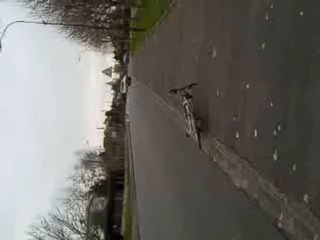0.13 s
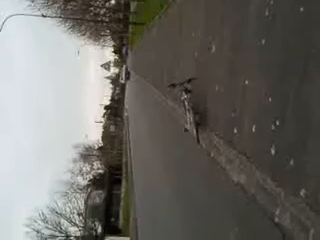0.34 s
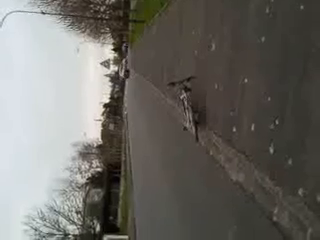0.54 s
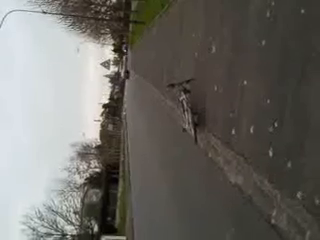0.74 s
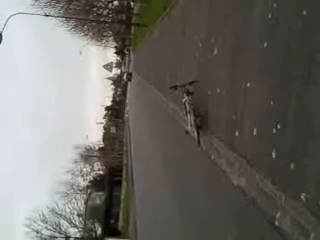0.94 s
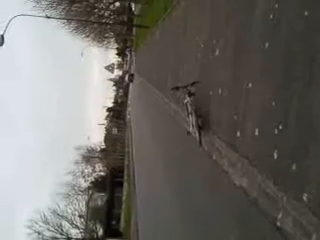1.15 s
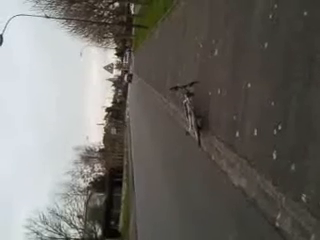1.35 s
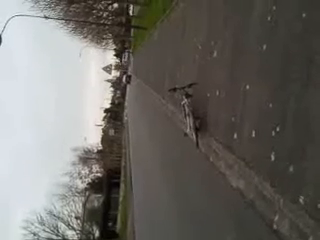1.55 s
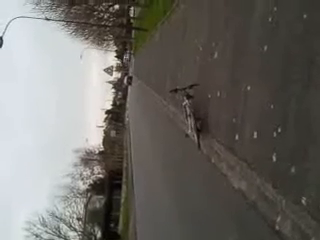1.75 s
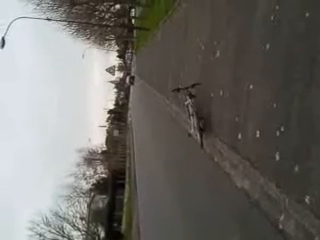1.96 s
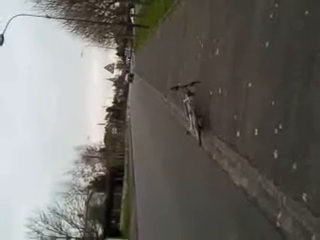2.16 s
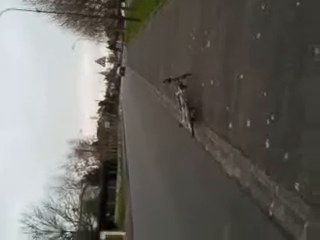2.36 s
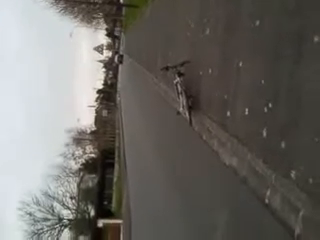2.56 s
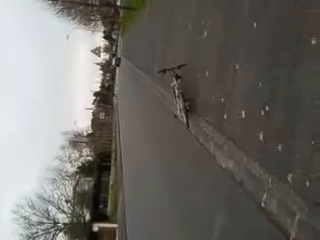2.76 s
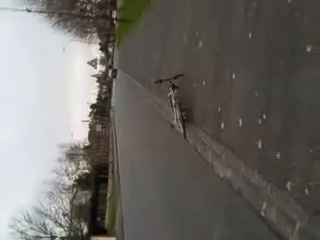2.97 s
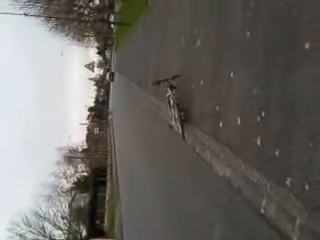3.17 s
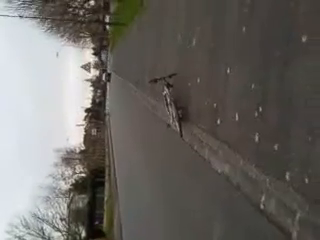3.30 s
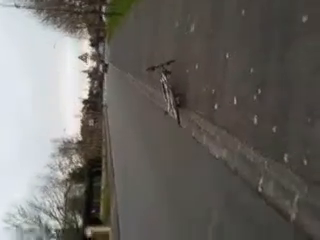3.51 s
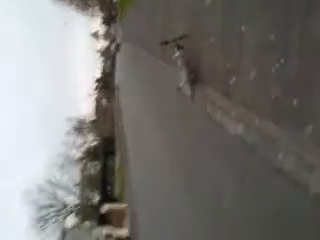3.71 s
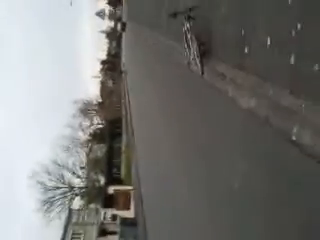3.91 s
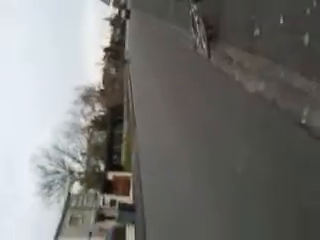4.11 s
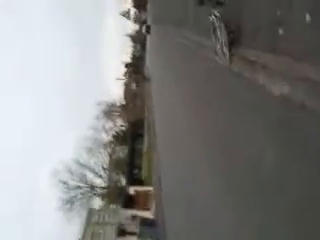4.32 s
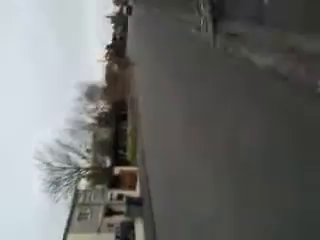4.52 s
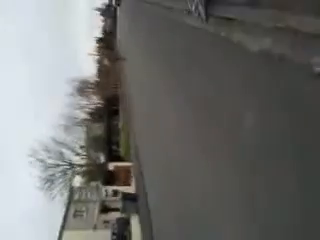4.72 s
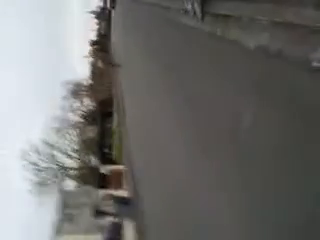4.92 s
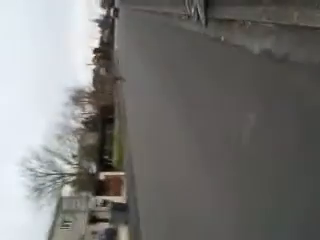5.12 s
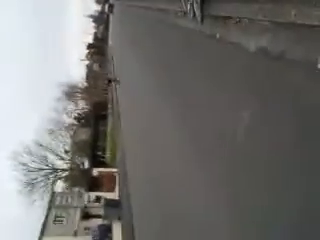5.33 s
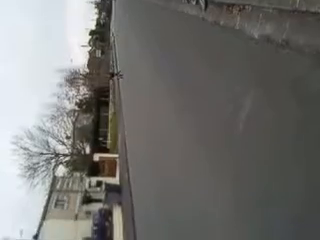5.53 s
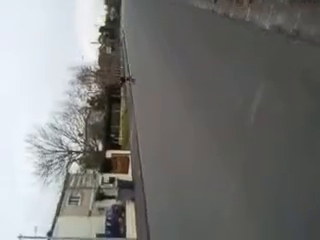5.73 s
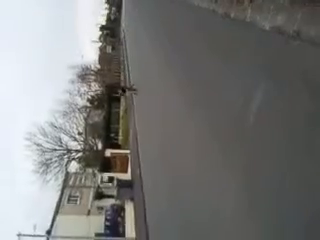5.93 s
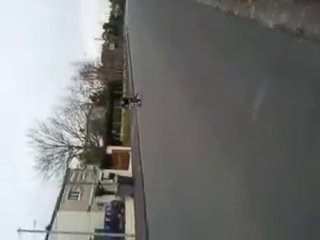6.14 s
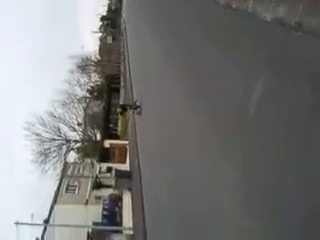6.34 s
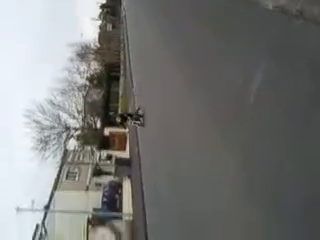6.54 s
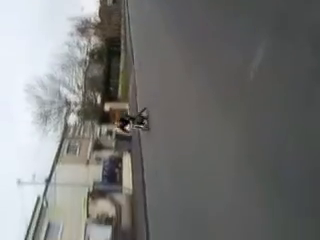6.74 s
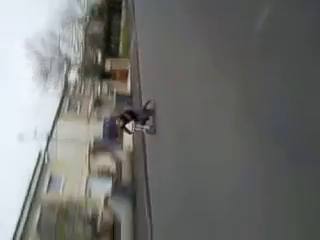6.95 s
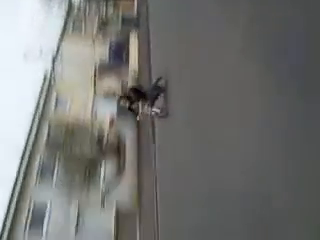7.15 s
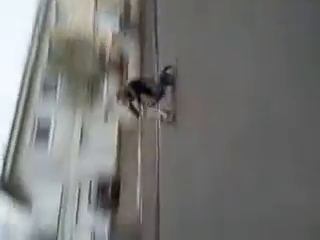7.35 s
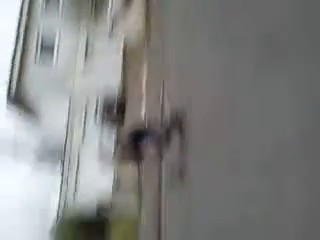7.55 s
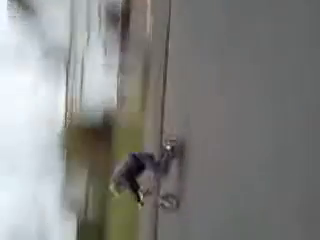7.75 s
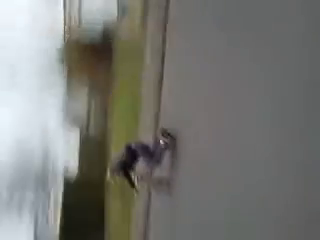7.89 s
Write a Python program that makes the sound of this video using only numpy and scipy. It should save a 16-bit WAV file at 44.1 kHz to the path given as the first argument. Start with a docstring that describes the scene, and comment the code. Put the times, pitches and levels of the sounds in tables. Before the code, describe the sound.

A raspy miniature motorbike starts faint up the street behind the boomy idle of another small engine. The nearby engine gives two quick barking revs, idles on and dies away. The approaching bike then takes over, a fast hard buzz with a thin ringing pipe, briefly misfiring before it goes by close. Low air and tyre wash and street echoes surround it, heard through a muffled, narrow-band, slightly overloaded microphone.

```python
"""A street of houses: a two-stroke pocket bike comes up it, gathers speed, misfires briefly and passes close by.
Each firing of the bike is a blow from its exhaust that sets the thin pipe rasping, over a low hum.
A second small engine near at hand is blipped twice and then runs down, with a booming silencer box.
Scattered echoes and a low wash of air and tyres surround them.
The narrow-band microphone flattens the loudest peaks."""
import sys
import numpy as np
from scipy import signal
from scipy.io import wavfile

SR = 44100
rng = np.random.default_rng(int(sys.argv[2]) if len(sys.argv) > 2 else 0)


def generate_wav(signal):
    """Clip the signal to [-1, 1] and save it as 16-bit WAV at the path in sys.argv[1]."""
    frames = np.transpose(np.atleast_2d(signal))
    scaled = np.clip(frames, -1, 1) * 32767
    pcm = np.round(scaled).astype(np.int16)
    wavfile.write(sys.argv[1], SR, pcm)


N = 355887
T = np.arange(N) / SR  # time of every sample, s


def gain_of(db):
    """Turns decibels into an amplitude factor."""
    return np.exp(np.asarray(db) * (np.log(10) / 20))


def evened(x):
    """Scales a sound to an average strength (rms) of 1."""
    return x / np.sqrt(np.mean(x ** 2) + 1e-20)


def read(points, hz):
    """Reads a spectrum table at any frequency, in straight lines on a log-frequency axis."""
    table_hz, value = np.transpose(points)
    return np.interp(np.log(hz + 1), np.log(table_hz + 1), value)


def curves(rows):
    """Draws each column of a time table as a line through every sample."""
    time_s, *columns = np.transpose(rows)
    return [np.interp(T, time_s, column) for column in columns]


def swings(rows):
    """Adds up a bell-shaped change in dB for each row (middle [s], length [s], change [dB])."""
    return sum(db * np.exp(-(2 * (T - s) / length) ** 2) for s, length, db in rows)


def ramp(start_s, length_s):
    """Rises from 0 to 1 in a straight line."""
    return np.clip((T - start_s) / length_s, 0, 1)


def waver(per_s, size=512):
    """Wanders at random with rms 1, heading for a new value so many times a second."""
    return evened(np.interp(T * per_s, np.arange(size), rng.standard_normal(size)))


def colour(x, points, smear=1, size=4096):
    """Filters to a spectrum: at smear 1 resonances ring on afterwards, at 0 the pulse is symmetric."""
    hz = abs(np.fft.fftfreq(size, 1 / SR))
    log_gain = np.log(gain_of(read(points, hz)))
    # the Hilbert transform gives the phase of a filter that only rings afterwards
    phase = smear * signal.hilbert(log_gain).imag
    taps = np.fft.ifft(np.exp(log_gain - 1j * phase)).real
    return signal.oaconvolve(x, np.fft.fftshift(taps))[size // 2:][:N]


def resonate(x, hz, widths_hz):
    """Rings at a moving pitch, once for each width; every result has rms 1."""
    turn = np.exp(2j * np.pi * np.cumsum(hz) / SR)
    still = x * turn.conj()  # shifts the moving pitch down to 0 Hz
    poles = np.exp(-np.pi * np.asarray(widths_hz) / SR)
    # the doubled pole makes the sides of the resonance steep
    return [evened((turn * signal.lfilter([1], np.poly([r, r]), still)).real) for r in poles]


def firings(hz):
    """Finds the moment of each turn of the crank: a two-stroke can fire once per turn."""
    turns = np.cumsum(hz) / SR
    return np.interp(np.arange(1, turns[-1]), turns, T)


def clicks(times, sizes, order=8):
    """Places a short click at each exact time, even between samples."""
    at = np.round(times * SR).astype(int)[:, None] + np.arange(-order, order + 1)
    off = at - times[:, None] * SR
    shape = np.sinc(off) * np.cos(np.pi * off / (2 * order + 1)) ** 2
    return np.bincount(np.clip(at, 0, N - 1).ravel(), (sizes[:, None] * shape).ravel(), N)


def puffs(train, decay_s):
    """Makes gas noise that flares at each click and dies away."""
    flare = signal.lfilter([1], [1, -np.exp(-1 / (decay_s * SR))], train)
    return evened(flare * rng.standard_normal(N))


# the bike's straight path past the microphone
PASS_S, CLOSEST_M, ROAD_M_PER_S = 7.58, 5.3, 9.6


def nearness():
    """Sound weakens as distance grows: closest distance over present distance, 1 at the closest."""
    return CLOSEST_M / np.hypot(CLOSEST_M, ROAD_M_PER_S * (T - PASS_S))


# when the bike's mixture fails to light: (start [s], end [s])
MISFIRE_TIMES = (6.502, 6.65)


def misfiring(edge_s=.01):
    """Is 1 while the mixture fails to light, else 0, with short slopes between."""
    start_s, end_s = MISFIRE_TIMES
    return ramp(start_s, edge_s) - ramp(end_s - edge_s, edge_s)


# charges that still catch around the misfire: (time [s], level against an ordinary firing [dB])
CAUGHT_CHARGES = [(6.545, -2.5), (6.565, -3), (6.5806, -2), (6.596, -2), (6.6111, -7), (6.653, -1.5)]


def combustion(hz, spread_db=1.0, jitter_s=.000024, dud_db=-12):
    """Burns each charge a little differently; in the misfire most are weak duds and a few still catch."""
    times = firings(hz)
    strength, late = rng.standard_normal((len(times), 2)).T
    start_s, end_s = MISFIRE_TIMES
    db = spread_db * strength + dud_db * ((times > start_s) & (times < end_s))
    times = times + jitter_s * late
    for caught_s, caught_db in CAUGHT_CHARGES:
        nearest = np.argmin(abs(times - caught_s))
        times[nearest], db[nearest] = caught_s, caught_db
    # the more firings a second, the smaller each one, for an even overall power
    return times, gain_of(db) / np.sqrt(np.interp(times, T, hz))


# tone of the exhaust blow from each side, far to behind: (frequency [Hz], relative level [dB])
FAR_TONE = [(100, -35.5), (250, -5), (450, -9.5), (650, -13), (800, -2.5), (1080, -2), (1300, -3.5),
            (1570, -11), (1800, 2), (2000, -9), (2500, -14), (4000, -44.5)]
HEAD_ON_TONE = [(100, -32.5), (280, -3), (430, -9.5), (570, -4), (710, 0.5), (1150, 1), (1400, -6.5),
                (1600, -3.5), (1760, 0.5), (2000, -10), (2600, -21), (4000, -43)]
CLOSE_TONE = [(100, -25), (290, -16), (430, -7.5), (580, -12), (730, -5.5), (1030, 1.5), (1280, -6.5),
              (1480, -13), (1620, -11), (1750, -7.5), (1950, -22), (2600, -22), (4000, -24)]
BESIDE_TONE = [(100, -36), (280, -1.5), (420, -5.5), (560, -11.5), (700, 1.5), (980, 3), (1130, 2.5),
               (1270, -1), (1420, -18), (2000, -18), (2600, -16), (4000, -21)]
BEHIND_TONE = [(100, -39), (280, -13.5), (420, -13.5), (550, -9.5), (690, -12.5), (830, -6.5), (970, 3),
               (1100, 0), (1250, -12), (1400, -18), (2100, -20), (4000, -34)]
BLOW_SMEAR = 0.48  # 0: all frequencies arrive together, 1: resonances ring on afterwards


def exhaust(train, view, gas_db=-12):
    """Blows sharply from the pipe at each firing, coloured by the side from which the bike is heard."""
    drive = evened(train) + gain_of(gas_db) * puffs(train, decay_s=0.0039)
    blows = np.zeros(N)
    for number, tone in enumerate([FAR_TONE, HEAD_ON_TONE, CLOSE_TONE, BESIDE_TONE, BEHIND_TONE]):
        share = np.maximum(1 - abs(view - number), 0)  # blends neighbouring views
        blows += share * evened(colour(drive, tone, BLOW_SMEAR))
    return blows


def rasp(times, sizes, ring_hz, width_hz, rough, lag_s=0.0005, spread_db=1.0, skirt_db=-15,
         narrow_hz=330, wide_hz=1100, follow=0.59):
    """Sets the thin pipe ringing, narrowly or broadly, with the jet of gas just after each blow."""
    # even a dud pushes gas out, so the rasp varies less than the blow
    jets = sizes ** follow * gain_of(spread_db * rng.standard_normal(len(times)))
    train = clicks(times + lag_s, jets)
    rough = np.clip(rough, 0, 1)
    drive = np.sqrt(1 - rough) * evened(train) + np.sqrt(rough) * puffs(train, decay_s=0.0068)
    narrow, wide = resonate(drive, ring_hz, [narrow_hz, wide_hz])
    broad = np.clip((width_hz - narrow_hz) / (wide_hz - narrow_hz), 0, 1)
    # a softer hiss spreads around the ring: (frequency [Hz], relative level [dB])
    skirt_tone = [(1200, -19), (2000, 0.5), (2650, -1.5), (3500, 7.5), (4500, -19.5)]
    skirt = evened(colour(puffs(train, decay_s=0.015), skirt_tone))
    return (1 - broad) * narrow + broad * wide + gain_of(skirt_db) * skirt


# brief swells and fades of the hum: (middle [s], length [s], change [dB])
HUM_CHANGES = [(3.88, 0.46, 5), (4.25, 0.19, -20), (5.28, 0.23, 5), (5.54, 0.21, -22), (7.0, 0.14, -14),
               (7.66, 0.17, -8.5)]
FULL_HZ, HUM_DB_PER_OCTAVE = 144, 14  # the hum grows with the revs, counted from this firing rate


def hum(hz, level_db=-24, waver_db=2, misfire_db=-20):
    """Sounds a wavering tone at the firing rate that grows with revs and nearness."""
    db = level_db + HUM_DB_PER_OCTAVE * np.log2(hz / FULL_HZ) + swings(HUM_CHANGES)
    db = db + misfire_db * misfiring() + waver_db * waver(per_s=13)
    tone = np.sqrt(2) * np.cos(2 * np.pi * np.cumsum(hz) / SR)
    return gain_of(db) * nearness() * tone


# firing rate as the bike gathers speed, before its waver and sag: (time [s], rate [Hz])
RATE_COMING = [(0.1, 82.7), (0.17, 82.5), (0.31, 84.2), (0.37, 86.9), (2.09, 112.7), (2.36, 116.3),
               (2.55, 112.7), (2.73, 124.7), (2.84, 123.4), (3.05, 126.0), (3.15, 121.7), (3.33, 130.2),
               (3.42, 129.3), (4.2, 137.7), (4.28, 135.7), (4.36, 138.8), (5.25, 146.8), (6.05, 147.0),
               (6.21, 144.7), (6.48, 144.7)]
# firing rate as heard while it goes by, likewise: (time [s], rate [Hz])
RATE_PASSING = [(6.68, 148.4), (6.73, 141.8), (7.024, 142.6), (7.384, 141.2), (7.446, 139.2),
                (7.724, 137.8), (7.922, 135), (8.07, 136.5)]
# pitch of the pipe's ring, before its waver: (time [s], pitch [Hz])
RING_PITCH = [(0.1, 2745), (0.36, 2860), (0.5, 2730), (1.34, 2847), (3.47, 2890), (3.85, 3074),
              (4.14, 2764), (4.32, 3393), (6.74, 3277), (7.65, 3067), (7.67, 3205), (8.07, 3100)]
# loudness up the street, before the trims: (time [s], blow level [dB], ring level [dB])
LEVELS_COMING = [(0.1, -44, -39), (0.5, -35.5, -34.5), (0.96, -33.5, -34), (1.45, -31.5, -29),
                 (1.95, -29, -30.5), (2.5, -28.5, -29.5), (3.45, -26, -25.5), (3.85, -25, -26),
                 (4.2, -25, -29), (4.6, -24, -28), (5.05, -20, -27.5), (5.5, -17.5, -27), (5.72, -15, -24),
                 (6.0, -15, -20.5), (6.31, -14.5, -17.5), (6.48, -15, -22.5)]
# loudness going by, before the trims: (time [s], blow level [dB], ring level [dB])
LEVELS_PASSING = [(6.68, -11.5, -19), (6.92, -13.5, -11.5), (7.26, -14, -13), (7.53, -20, -8),
                  (7.644, -12.5, -12.5), (7.968, -15, -12), (8.07, -14, -18.5)]
# the bike stumbles for a few firings: (middle [s], length [s], change [dB])
STUMBLE_DIPS = [(6.25, .07, -4), (6.41, 0.072, -0.5), (6.72, 0.035, -5.5)]
# how the bike is heard: (time [s], view [0 far, 1 head-on, 2 close, 3 beside, 4 behind],
# street echo of the blows [dB], rasp roughness [0-1], nominal width of the ring [Hz])
BIKE_VIEW = [(0.1, 1.85, -8.5, 0.39, 770), (2.3, 1.43, -3.5, .38, 780), (4.1, 0.59, -8, .45, 822),
             (4.7, 1.25, -8, .75, 685), (5.6, 2.34, -7.5, 0.59, 384), (6.55, 2.68, -7.5, .4, 370),
             (6.95, 2.26, -5.5, 0.031, 330), (7.25, 2.5, -9.5, .05, 410), (7.5, 3.1, 1, .14, 920),
             (7.62, 4, 0.5, .07, 584), (8.07, 3.97, -8, .07, 380)]
MISFIRE_SAG_HZ = 6  # the firing rate drops while it misfires


def bike(blow_db=0.9, ring_db=1.25, rasp_echo_db=3, ring_misfire_db=-5, flutter_db=2.0,
         ring_waver_hz=70, speed_waver_hz=0.2817):
    """Joins blows, rasp and hum of the bike; gives the direct sound and what goes out to the houses."""
    hz = curves(RATE_COMING + RATE_PASSING)[0] - MISFIRE_SAG_HZ * misfiring()
    hz = hz + speed_waver_hz * waver(per_s=14)
    farness = 1 - nearness()  # the ring is steadier when close
    ring_hz = curves(RING_PITCH)[0] + ring_waver_hz * farness * waver(per_s=18)

    blow_level, ring_level = curves(LEVELS_COMING + LEVELS_PASSING)
    stumble = swings(STUMBLE_DIPS)
    blow_level = blow_level + stumble + blow_db
    ring_level = ring_level + stumble + ring_db
    ring_level = ring_level + ring_misfire_db * misfiring() + flutter_db * farness * waver(per_s=25)

    view, echo_db, rough, width_hz = curves(BIKE_VIEW)
    times, sizes = combustion(hz)
    blows = gain_of(blow_level) * exhaust(clicks(times, sizes), np.clip(view, 0, 4))
    ring = gain_of(ring_level) * rasp(times, sizes, ring_hz, width_hz, rough)

    # the pipe beams its rasp at the houses, so more of that comes back as echo
    wet = gain_of(echo_db)
    ring_wet = wet * gain_of(rasp_echo_db)
    # shares the power between direct sound and echo
    blows = blows / np.sqrt(1 + wet ** 2)
    ring = ring / np.sqrt(1 + ring_wet ** 2)
    return blows + ring + hum(hz), wet * blows + ring_wet * ring


# second engine ticking over, before hunting and trims: (time [s], firing rate [Hz], level [dB])
TICKING_OVER = [(0.1, 71.38, -33), (1.3, 72.07, -34.5), (3.1, 75.7, -31), (4.3, 79.03, -29)]
# blips of its throttle: (starts to open [s], starts to shut [s], throttle [0-1])
THROTTLE_BLIPS = [(1.316, 1.76, 0.91), (1.909, 2.26, 0.94)]
# the throttle moves in a ramp; the revs lag behind it, up towards BLIP_HZ and down again
THROTTLE_S, REV_UP_S, REV_DOWN_S, BLIP_HZ = 0.097, .23, .24, 101
OPEN_DB, COAST_DB = 7.5, -25  # louder under throttle, quieter while coasting down
# switched off, it spins down and fades
CUT_S, RUN_DOWN_S, FADE_DB_PER_S = 4.38, 1.5, -8.5


def other_controls(hunt_hz=.6):
    """Works out rate, level, throttle and revs of the second engine: idle, two blips and a spin-down."""
    idle_hz, idle_db = curves(TICKING_OVER)
    throttles, rev_rises = [], []
    for opens, shuts, depth in THROTTLE_BLIPS:
        throttles.append(depth * (ramp(opens, THROTTLE_S) - ramp(shuts, THROTTLE_S)))
        rise = np.sin(np.pi / 2 * ramp(opens, REV_UP_S)) ** 2
        rev_rises.append(rise * np.exp(-np.maximum(T - shuts, 0) / REV_DOWN_S))
    throttle, revs = np.max(throttles, axis=0), np.max(rev_rises, axis=0)
    since_cut = np.maximum(T - CUT_S, 0)
    hz = (idle_hz + (BLIP_HZ - idle_hz) * revs) * np.exp(-since_cut / RUN_DOWN_S)
    hz = hz + hunt_hz * waver(per_s=8)
    coasting = np.maximum(revs - throttle, 0)
    db = idle_db + OPEN_DB * throttle + COAST_DB * coasting + FADE_DB_PER_S * since_cut
    return hz, db, np.clip(throttle, 0, 1), revs


# exhaust tone with the throttle nearly shut: (frequency [Hz], relative level [dB])
SHUT_TONE = [(70, -15.5), (145, -3.5), (210, -3.5), (238, -8), (290, -18.5), (390, -6), (428, 4.5),
             (480, -6.5), (570, 2), (640, -0.5), (800, -7), (1300, -11.5), (2100, -14), (2800, -11),
             (4000, -22)]
# exhaust tone with the throttle wide open: (frequency [Hz], relative level [dB])
OPEN_TONE = [(60, -12), (100, 1), (200, 0), (300, -6.5), (450, 1), (650, 2.5), (900, -5), (1400, -5.5),
             (1950, -1), (2200, 0), (2400, -3.5), (2650, -4), (3200, -7.5), (4000, -15.5)]
# boom of its silencer box: (frequency [Hz], relative level [dB])
BOX_TONE = [(120, -32), (195, -14.5), (240, -3), (275, -5.5), (330, -23.5), (400, -0.5), (428, 4.5),
            (460, -16), (540, -17.5), (572, -4), (630, -16.5), (720, -41)]
CUT_DB = -7  # extra drop of the pipe once switched off; the box is still pumped
BARK_HZ, BARK_WIDTH_HZ, BARK_DRIFT_HZ = 2220, 330, 90  # resonance of its pipe at high revs


def other_engine(limp=0.05, spread_db=3.0, steadying=0.4, jitter_s=.00004, gas_db=-6,
                 level_db=-2.0, box_db=-4, bark_db=-6):
    """Steadies uneven firings under throttle; the box booms and high revs bring out a hard bark."""
    hz, db, throttle, revs = other_controls()
    times = firings(hz)
    strength, late = rng.standard_normal((len(times), 2)).T
    unevenness_db = spread_db * (1 - steadying * np.interp(times, T, throttle))
    # every second firing is a little weaker
    sizes = gain_of(unevenness_db * strength) * (1 + limp * (-1) ** np.arange(len(times)))
    train = clicks(times + jitter_s * late, sizes)
    drive = evened(train) + gain_of(gas_db) * puffs(train, decay_s=0.01)

    bark, = resonate(drive, BARK_HZ + BARK_DRIFT_HZ * waver(per_s=8.9), [BARK_WIDTH_HZ])
    shut_pipe = evened(colour(drive, SHUT_TONE))
    open_pipe = evened(colour(drive, OPEN_TONE)) + gain_of(bark_db) * revs * bark
    pipe = (1 - throttle) * shut_pipe + throttle * open_pipe
    pipe_level = gain_of(db + level_db + CUT_DB * ramp(CUT_S, THROTTLE_S))
    boom = gain_of(db + box_db) * (1 - throttle) * evened(colour(train, BOX_TONE))
    return pipe_level * pipe, boom


# tone of air and tyres: (frequency [Hz], relative level [dB])
RUMBLE_TONE = [(15, -9), (40, -5.5), (80, -2), (200, -2), (400, -4.5), (1000, -1.5), (4000, -23)]


def rumble(air_db=-42, tyres_db=-25.5, falloff=1.4):
    """Filters noise into a low wash: steady air, and tyres that swell as the bike arrives."""
    level = gain_of(air_db) + gain_of(tyres_db) * nearness() ** falloff
    return level * evened(colour(rng.standard_normal(N), RUMBLE_TONE))


# echoes from houses and gardens: (frequency [Hz], time to fade by 60 dB [s])
STREET_FADE = [(100, 0.91), (1000, 0.84), (4000, 0.39)]


def street(x, first_s=0.0028, order=20, count=3, size=16384, turn_s=0.6015):
    """Scatters echoes as from road, walls and gardens; the mix of three echo patterns keeps turning."""
    # one echo of random sign at a random place in each short slot
    taps = np.zeros((count, size))
    at = np.arange(0, size - order, order)
    at = at + rng.integers(0, order, (count, len(at)))
    np.put_along_axis(taps, at, rng.choice([-1., 1.], at.shape), 1)
    # each frequency fades at its own pace
    hz, t, z = signal.stft(taps * (T[:size] > first_s), SR, nperseg=256)
    fade = np.exp(-np.log(1000) * t / read(STREET_FADE, hz)[:, None])
    tails = signal.istft(z * fade, SR, nperseg=256)[1]
    tails /= np.linalg.norm(tails, axis=1, keepdims=True)
    angle = np.pi * (T / turn_s + np.arange(count)[:, None] / count)
    shares = np.sqrt(2 / count) * np.cos(angle)  # squares sum to 1
    return signal.oaconvolve(x * shares, tails, axes=1)[:, :N].sum(0)


def scene(other_echo_db=-8):
    """Adds both engines and their echoes to the wash of air and tyres."""
    direct, scattered = bike()
    pipe, boom = other_engine()
    echoes = street(scattered + gain_of(other_echo_db) * pipe)
    return (direct + pipe + boom + echoes + rumble())[None]


# what the microphone lets through: (frequency [Hz], level [dB])
MIC_BAND = [(10, -23.5), (40, -8.5), (120, -2), (3300, 0.5), (3650, -4.5), (3950, -10.5), (4380, -16.5),
            (4540, -46.5), (4700, -100.5)]
START_S = .087  # silence before this; the sound then begins with both engines already running
EDGE_HZ = 16000  # top edge of the final treble cut


def record(dry, knee=0.6, headroom=0.15):
    """Narrows the band, then overloads: only flattened peaks make any high treble."""
    x = colour(dry[0] * (T > START_S), MIC_BAND)
    # straight up to the knee, then bending over softly into the headroom
    excess = np.maximum(abs(x) - knee, 0)
    x = np.clip(x, -knee, knee) + np.sign(x) * headroom * np.tanh(excess / headroom)
    treble_cut = signal.firwin(511, EDGE_HZ, window=("kaiser", 9), fs=SR)
    return signal.oaconvolve(x, treble_cut, "same")[None]


dry = scene()
out = record(dry)
generate_wav(out)
```